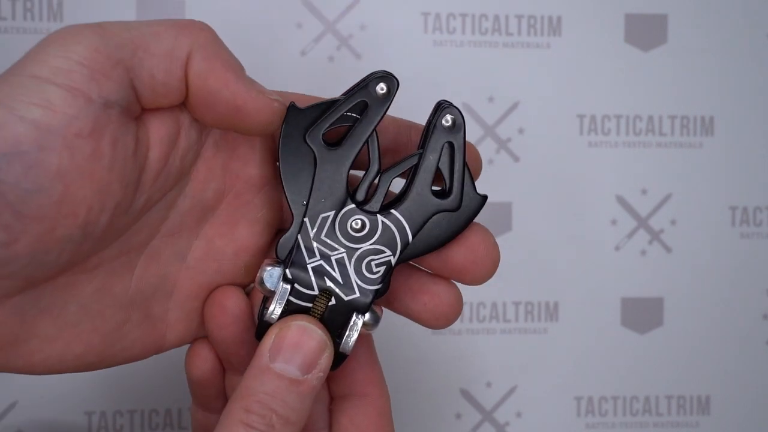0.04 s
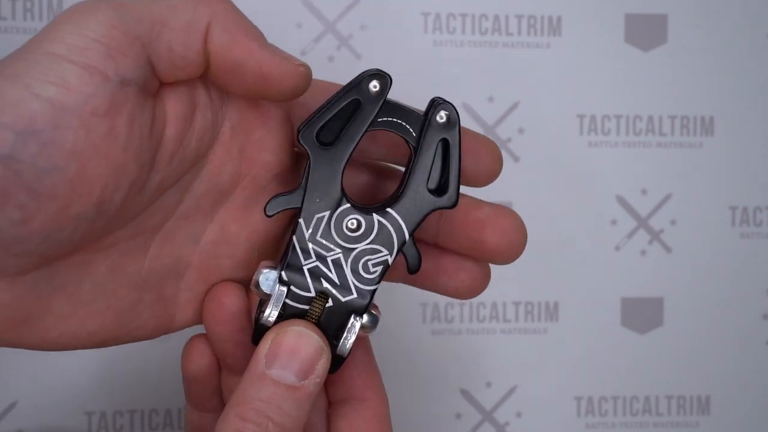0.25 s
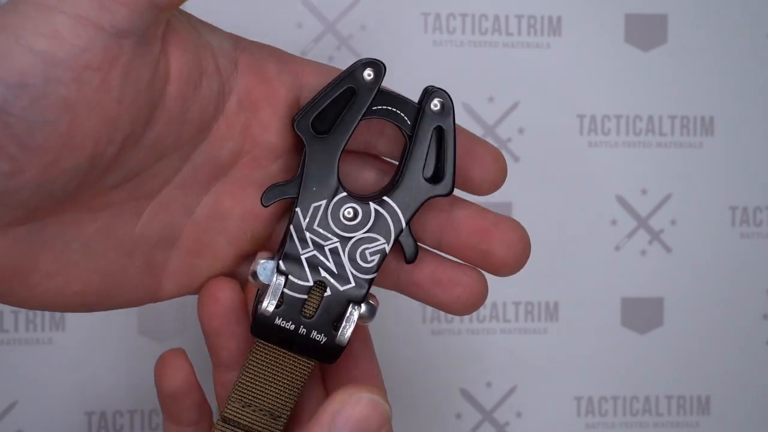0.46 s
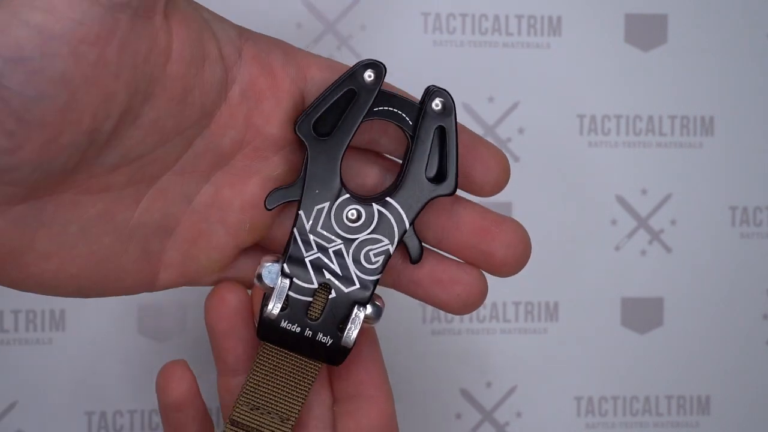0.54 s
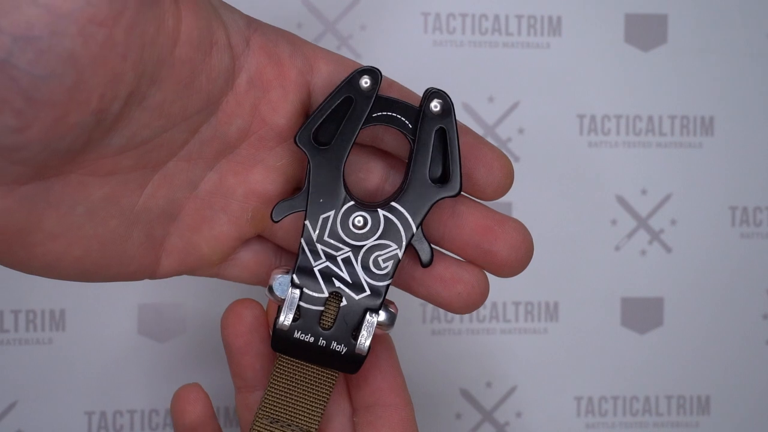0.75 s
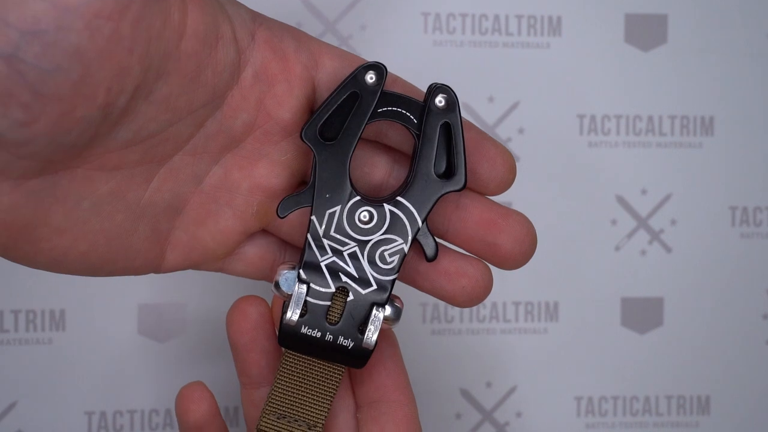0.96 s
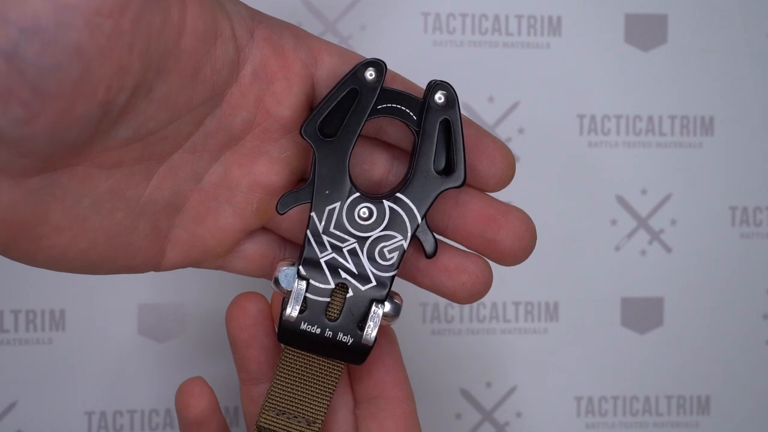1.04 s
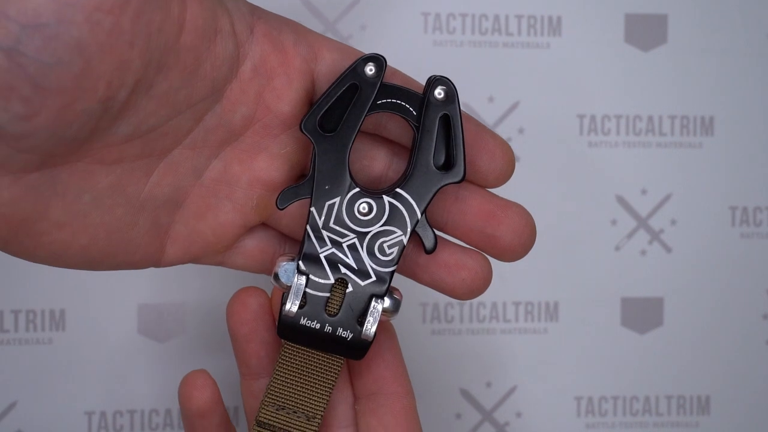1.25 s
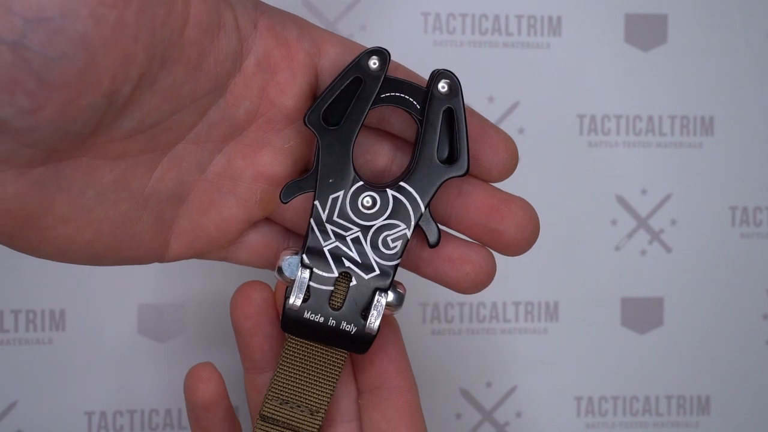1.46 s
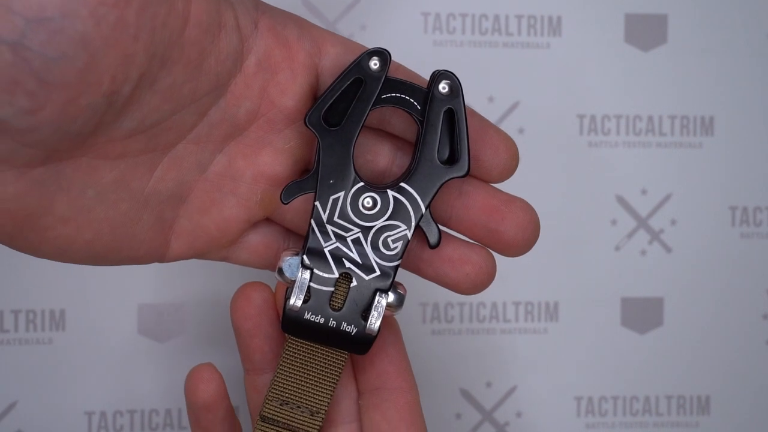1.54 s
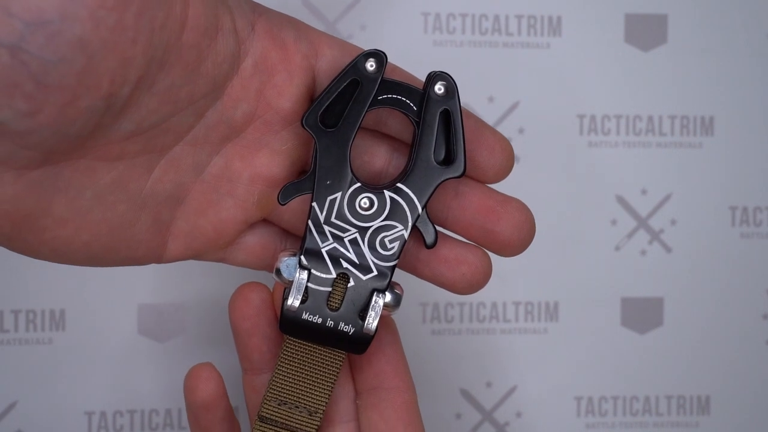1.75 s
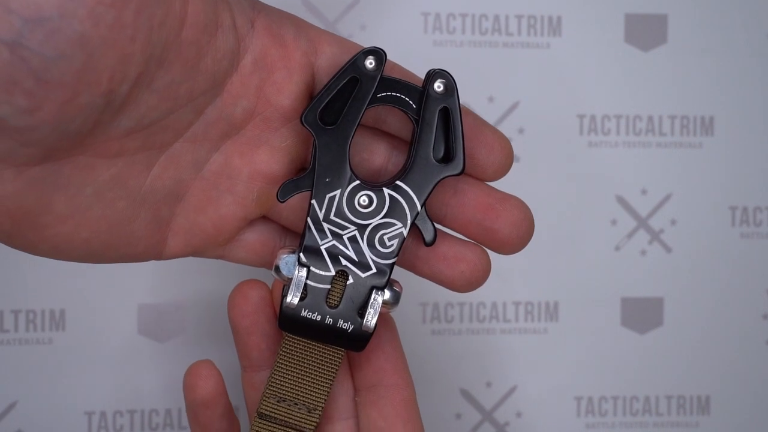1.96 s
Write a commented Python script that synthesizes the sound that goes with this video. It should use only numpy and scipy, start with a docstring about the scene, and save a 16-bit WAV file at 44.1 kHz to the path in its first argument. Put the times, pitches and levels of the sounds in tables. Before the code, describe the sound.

A metal carabiner snaps shut in the hand. A faint tick and a tiny scrape lead straight into one sharp, bright crack, close to the microphone. It rings briefly in a quiet, live room with soft ventilation noise.

```python
"""A metal carabiner snaps shut in the hand, close to the microphone in a quiet, live room.
The catch ticks and slides, the sprung jaws touch and then slam; the blow cracks, rings the metal
and drives the recorder into its limiter. A short, low thump is heard at the loudest instant.
The room carries the bright ring for half a second over soft ventilation noise and mains hum."""
import sys
import numpy as np
from scipy import signal
from scipy.fft import rfft, irfft
from scipy.io import wavfile
from scipy.ndimage import uniform_filter1d, minimum_filter1d

SR = 44100
rng = np.random.default_rng(int(sys.argv[2]) if len(sys.argv) > 2 else 0)


def digitize_waveform(pressure):
    """Quantize a signal to 16-bit integers and store it at the path in sys.argv[1].

    Rows of a 2-D input are taken as channels; values are limited to [-1, 1].
    """
    field = np.atleast_2d(pressure).T
    bounded = np.clip(field, -1, 1)
    quanta = np.round(bounded * 32767).astype(np.int16)
    wavfile.write(sys.argv[1], SR, quanta)


N = 88200
T = np.arange(N) / SR
HZ = np.arange(N // 2 + 1) * SR / N


def jaws():
    """Each blow cracks and rings the metal; returns the sound close up and its reverberation."""
    # blows of the jaws: t/s, ring level/dB, crack level/dB
    blows = [(0.1515, -33, -14), (0.1546, -34, -26), (0.1562, -5.5, 1.5), (0.1579, -25.5, -10)]
    # modes of the carabiner: f/Hz, level to the microphone/dB, level into the room/dB, t60/s
    modes = [(2133, -27, -32, 0.036), (2500, -28.5, -27.5, 0.024), (3360, -13.5, -23, 0.018),
             (3817, 5, -15.5, 0.026), (3880, -10.5, -12.5, 0.052), (4292, -27.5, -17.5, 0.058),
             (4337, -23.5, -9.5, 0.065), (5330, -20, -17.5, 0.016), (5475, -16.5, -11, 0.022),
             (6340, -28, -26, .022), (6917, -18.5, -30.5, 0.026), (9000, -27, -18.5, .014),
             (11132, -5.5, -18.5, 0.016), (13970, -8, -23.5, 0.006)]
    # spectrum of the crack: f/Hz, level to the microphone/dB, level into the room/dB
    crack = np.array([(300, -38.5, -50.5), (1400, -29, -27), (2300, -18, -8), (2750, -19.5, -8.5),
                      (3400, -0.5, 4.5), (4240, -4, 13.5), (4560, 0, -1.5), (5200, 1.5, 9.5),
                      (6700, -6.5, -7), (8750, -5.5, -2), (10700, -0.5, -2), (14000, 1, -8),
                      (16000, -8.5, -14)])
    near_metal = sum(undb(db) * ring(hz, t60) for hz, db, _, t60 in modes)
    room_metal = sum(undb(db) * ring(hz, t60) for hz, _, db, t60 in modes)
    near_ring = sum(undb(db) * delay(near_metal, s) for s, db, _ in blows)
    room_ring = sum(undb(db) * delay(room_metal, s) for s, db, _ in blows)
    chatter = rng.standard_normal(N) * sum(undb(db) * fade(s, t60=.009) for s, _, db in blows)
    impulses = sum(undb(db) * delay(T == 0, s) for s, _, db in blows)
    near_crack = colour(chatter, crack[:, [0, 1]])
    room_crack = undb(5) * colour(impulses, crack[:, [0, 2]])
    return near_ring + near_crack, room(room_ring) + room(room_crack)


def thump():
    """A short, low thump heard at the loudest instant."""
    # its decaying low tones: f/Hz, level/dB, t60/s
    tones = [(100, -24, .024), (200, -28, 0.019), (400, -30, 0.014), (640, -21.5, 0.011), (1523, -22, .011)]
    return delay(sum(undb(db) * ring(hz, t60) for hz, db, t60 in tones), s=.1568)


def catch(slips_per_s=17000):
    """A swelling scrape of tiny slips as the catch slides before it lets go."""
    # spectrum of the scrape: f/Hz, relative level/dB
    spectrum = [(1500, -22.5), (3000, -6), (3900, -1.5), (4800, -6), (5900, 3.5), (7500, -6), (10000, -3),
                (14000, -3), (16000, -7)]
    # swell of the slide: t/s, level/dB
    times, db = np.array([(.121, -72.5), (0.134, -60), (.144, -50.5), (.148, -55), (.156, -65)]).T
    slips = rng.standard_normal(N) * (rng.random(N) < slips_per_s / SR)
    scrape = colour(slips, spectrum)
    swell = undb(np.interp(T, times, db)) * (T > times[0]) * (T < times[-1])
    return swell * scrape / scrape.std()


def loose_parts():
    """Loose parts tick faintly, each touch a short burst of bright noise."""
    # ticks: t/s, level/dB
    ticks = [(0.0729, -54), (0.078, -62), (0.1303, -45), (1.592, -67.5)]
    # spectrum of a tick: f/Hz, relative level/dB
    spectrum = [(1500, -27), (3000, -11), (4000, 6), (5500, -2), (7500, -9), (10000, -25), (16000, -37.5)]
    bursts = sum(undb(db) * fade(s, t60=.014) for s, db in ticks)
    return bursts * noise(undb(along(spectrum, HZ)))


def near_echoes(x):
    """The table and hands throw the sound back to the microphone within milliseconds."""
    # reflections: delay/s, level/dB
    echoes = [(.0046, -21.5), (.0075, -21.5)]
    return sum(undb(db) * delay(x, s) for s, db in echoes)


def room(x, gain_db=-4.5, gap_s=.01, build_s=.012):
    """Diffuse reflections build up after a short gap; the high treble and the lows die first."""
    # reverberation time: f/Hz, t60/s
    decay = [(500, 0.19), (2500, .56), (4200, .54), (5500, .5), (8000, .37), (11000, .3), (15000, .2)]
    centres = np.geomspace(500, 16000, 16)
    white, response = rfft(noise(1)), 0
    for hz, share in zip(centres, np.eye(len(centres))):
        band = irfft(white * np.interp(HZ, centres, share), N)
        response = response + band * fade(0, along(decay, hz))
    build_up = np.sqrt(np.minimum(T / build_s, 1))
    response = delay(response * build_up, gap_s)
    response /= np.sqrt(np.sum(response ** 2))
    return undb(gain_db) * signal.fftconvolve(x, response)[:N]


def room_tone(air_db=-66, hum_db=-71.5, hum_hz=50):
    """Steady room air, the resonances of a ventilation fan and a faint mains hum."""
    # spectrum of the air: f/Hz, relative level/dB
    spectrum = [(20, -7), (40, -8.5), (65, -9.5), (100, -11.5), (170, -6), (240, -5.5), (400, -9),
                (730, -11.5), (1150, -11), (1400, -17), (1900, -20.5), (3000, -25), (5000, -30.5),
                (15000, -33.5)]
    # resonances of the ventilation: f/Hz, width/Hz, level/dB
    resonances = [(205, 9.1, -73), (290, 42, -74), (555, 16, -76), (605, 73, -70.5), (903, 160, -73),
                  (1148, 20, -78.5), (2566, 90, -86)]
    vent = sum(undb(db) * noise(1 / (1 + 2 * ((HZ - hz) / width) ** 2)) for hz, width, db in resonances)
    air = undb(air_db) * noise(undb(along(spectrum, HZ)))
    hum = undb(hum_db) * np.sqrt(2) * np.sin(2 * np.pi * hum_hz * T)
    return air + vent + hum


def undb(db):
    """Decibels to gain."""
    return 10 ** (np.asarray(db) / 20)


def along(points, hz):
    """Read a table on a log-frequency axis."""
    f, v = np.array(points).T
    return np.interp(np.log(hz + 1), np.log(f), v)


def colour(x, points):
    """Filter a sound by a table of f/Hz, level/dB."""
    return irfft(rfft(x) * undb(along(points, HZ)), N)


def noise(gain):
    """Noise of rms 1, its spectrum shaped by gain."""
    x = irfft(gain * np.exp(2j * np.pi * rng.random(len(HZ))), N)
    return x / x.std()


def fade(start, t60):
    """A sudden start and an exponential decay."""
    return (T >= start) * np.exp(-np.log(1000) * np.maximum(T - start, 0) / t60)


def ring(hz, t60):
    """One decaying tone."""
    return np.cos(2 * np.pi * hz * T) * fade(0, t60)


def delay(x, s):
    """The same sound, s seconds later."""
    return np.concatenate([np.zeros(int(s * SR)), x])[:N]


def scene(radiation_hz=1700):
    """One microphone close to the carabiner, with the room behind it."""
    near, reverb = jaws()
    small_sounds = catch() + loose_parts()
    # small metal parts radiate little at low frequencies
    radiation = signal.butter(2, radiation_hz, "high", fs=SR, output="sos")
    metal = signal.sosfilt(radiation, near + near_echoes(near))
    return (metal + reverb + thump() + small_sounds + room(small_sounds) + room_tone())[None]


def record(dry, limiter_s=.0004, top_hz=15800):
    """The recorder's very fast limiter flattens the slam; a steep filter cuts the top."""
    window = int(limiter_s * SR)
    needed_gain = 1 / np.maximum(np.abs(dry), 1)
    gain = uniform_filter1d(minimum_filter1d(needed_gain, window), window)
    top_cut = signal.ellip(10, .1, 80, top_hz, fs=SR, output="sos")
    return signal.sosfilt(top_cut, dry * gain)


dry = scene()
out = record(dry)
digitize_waveform(out)
```